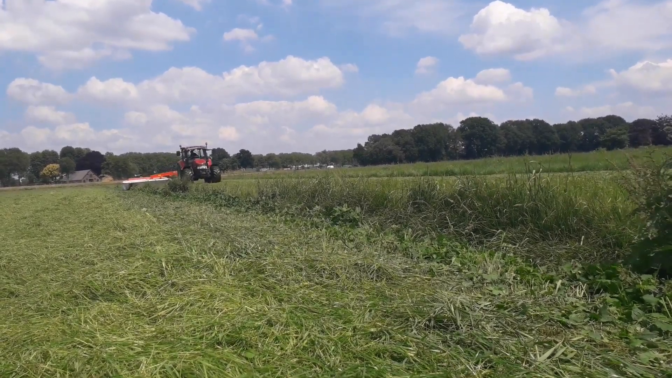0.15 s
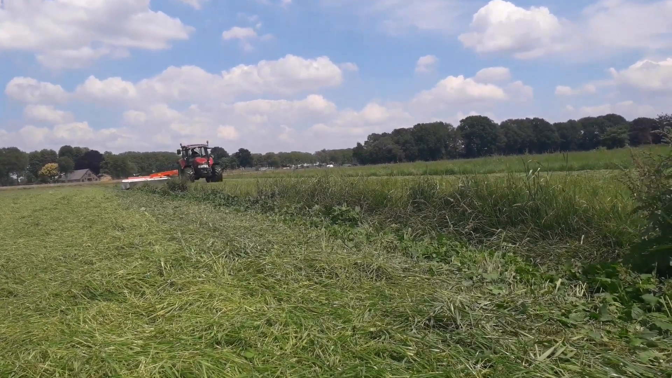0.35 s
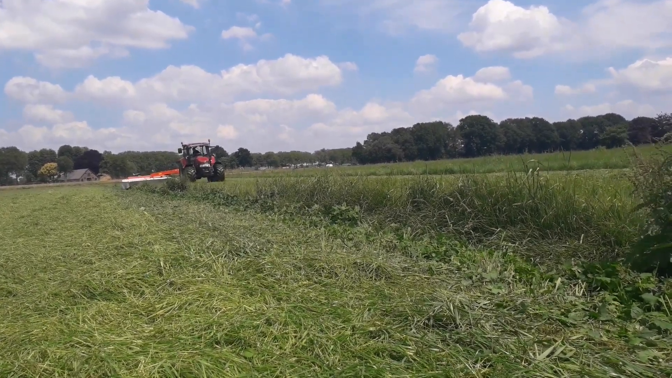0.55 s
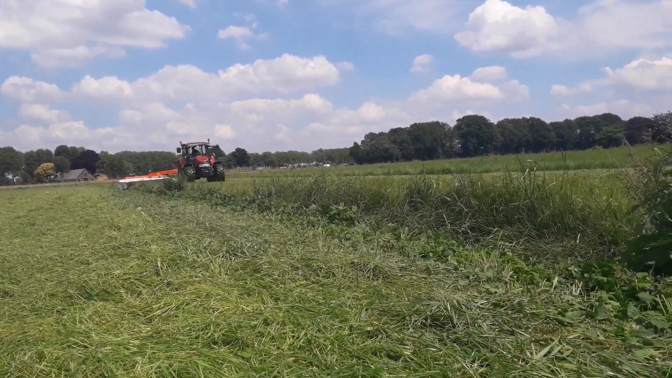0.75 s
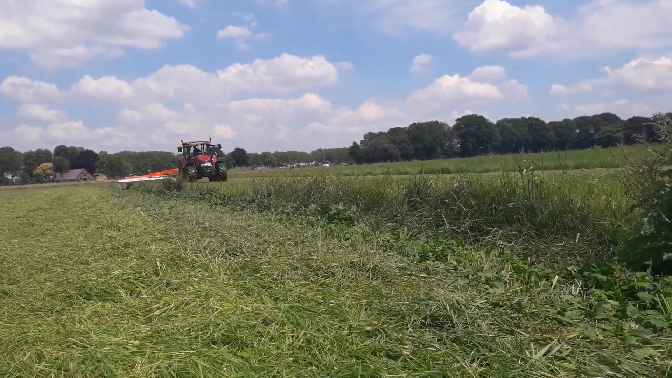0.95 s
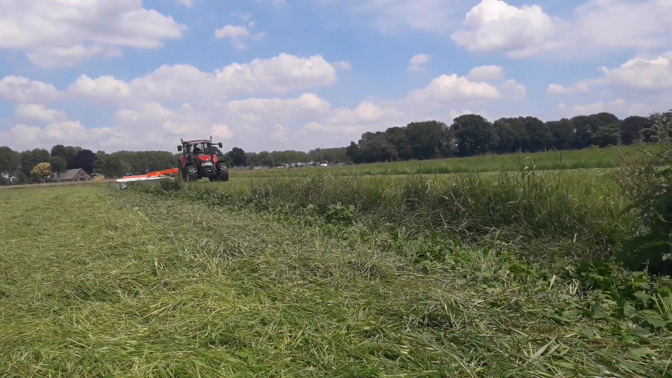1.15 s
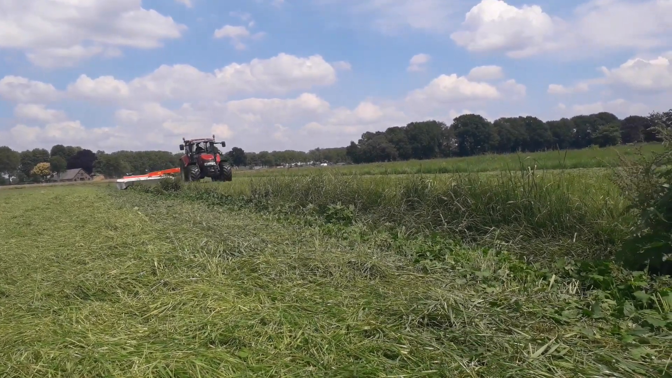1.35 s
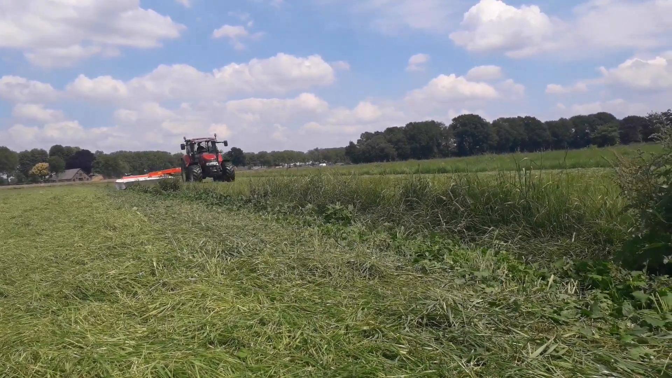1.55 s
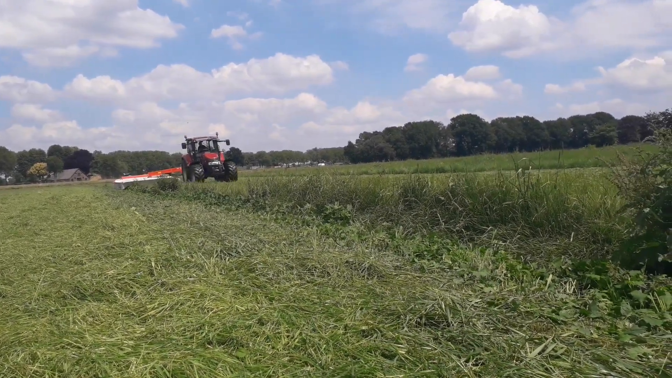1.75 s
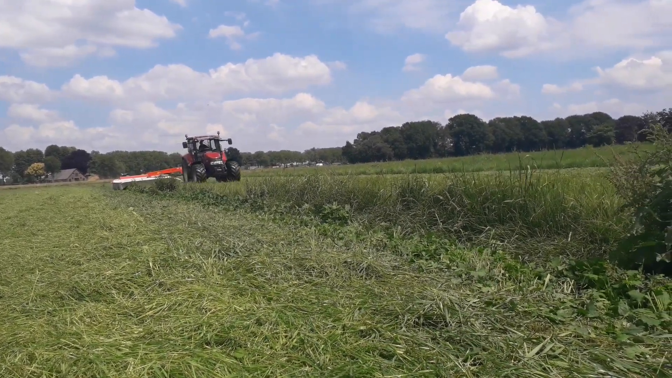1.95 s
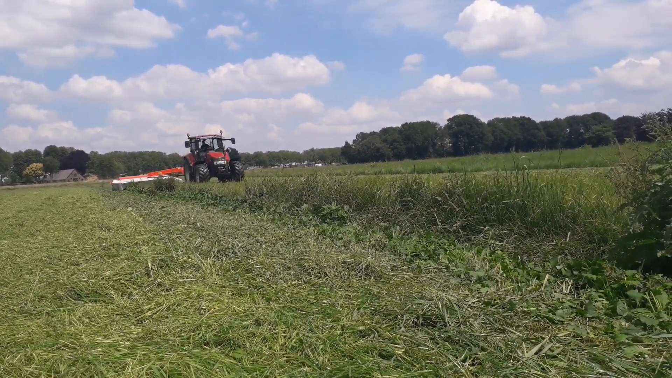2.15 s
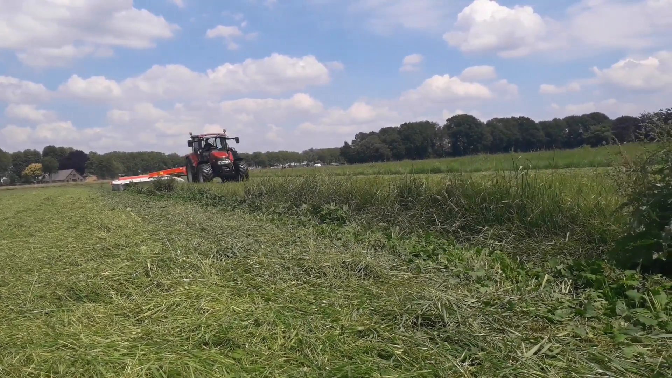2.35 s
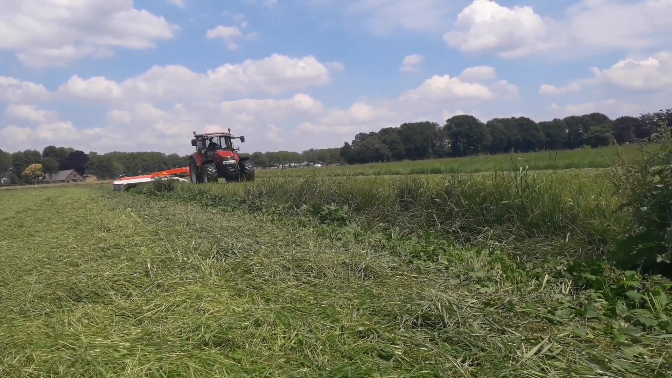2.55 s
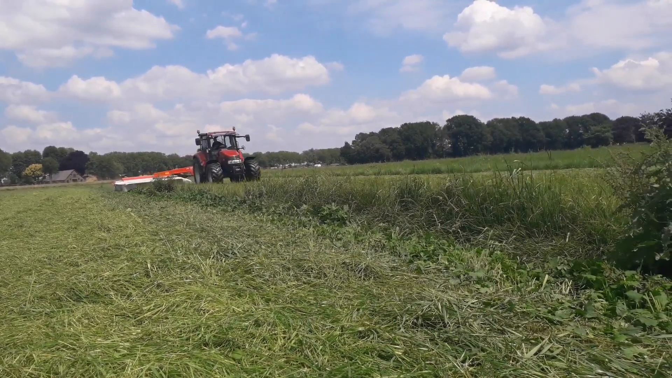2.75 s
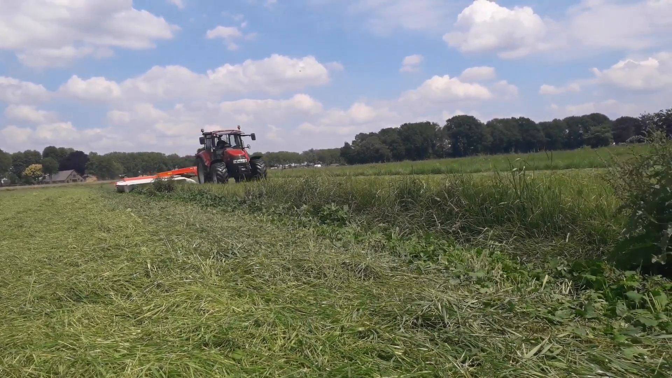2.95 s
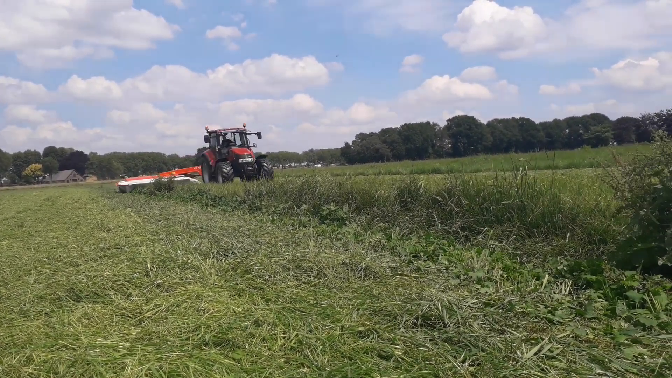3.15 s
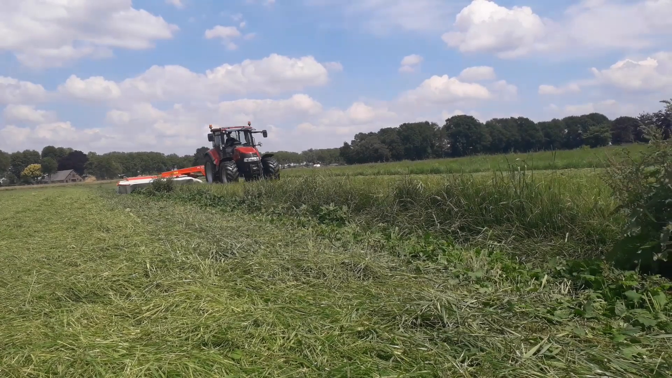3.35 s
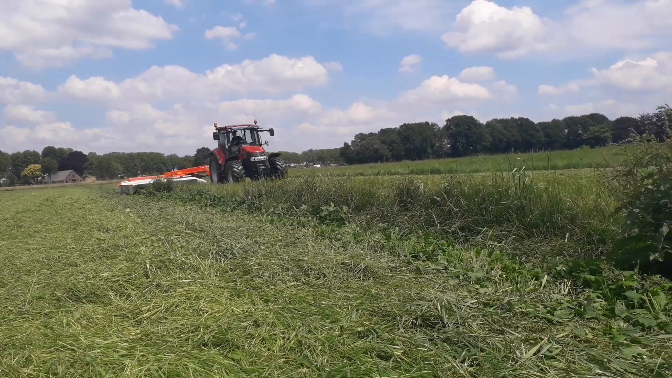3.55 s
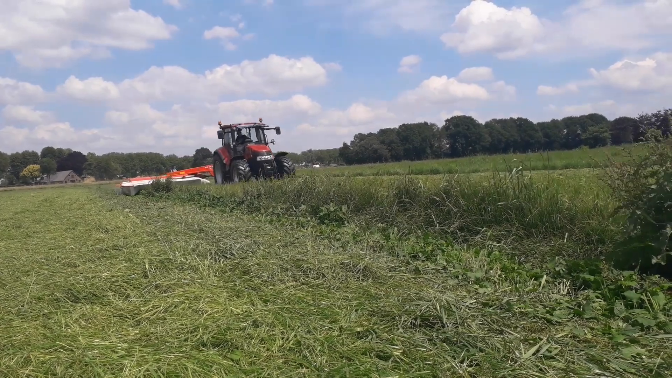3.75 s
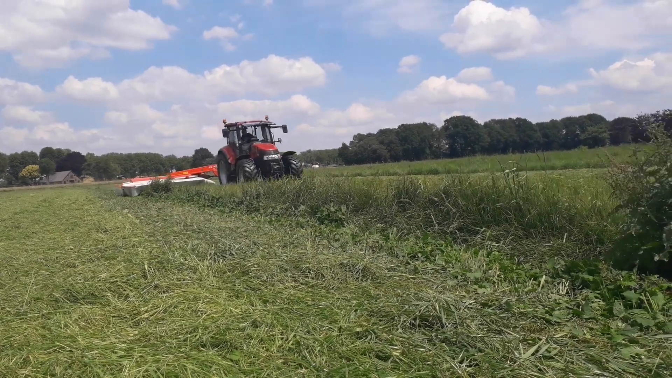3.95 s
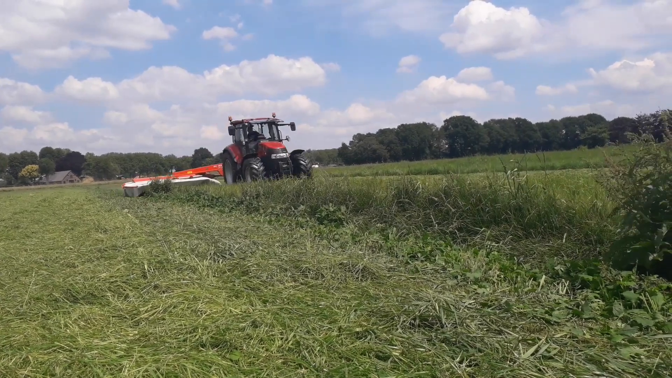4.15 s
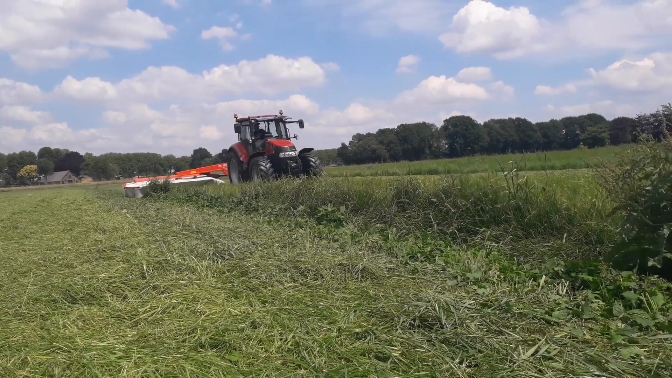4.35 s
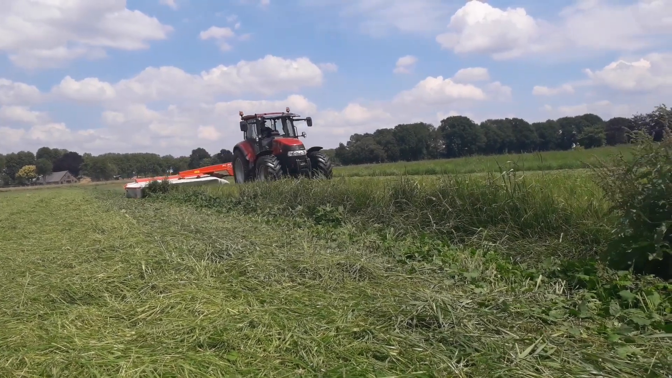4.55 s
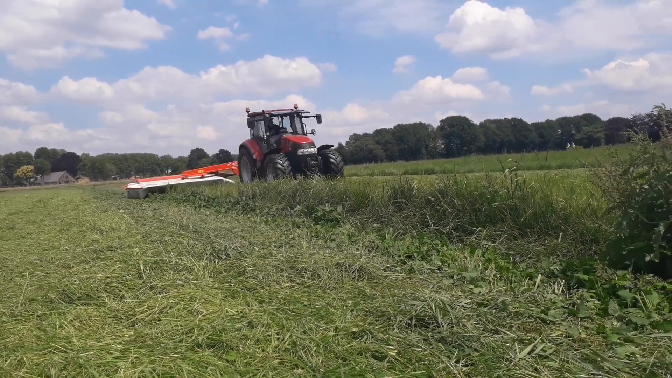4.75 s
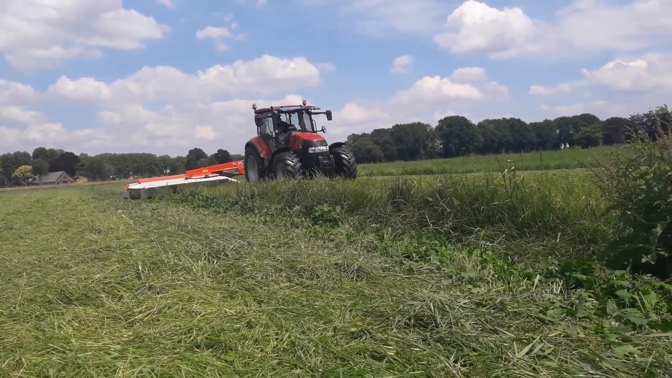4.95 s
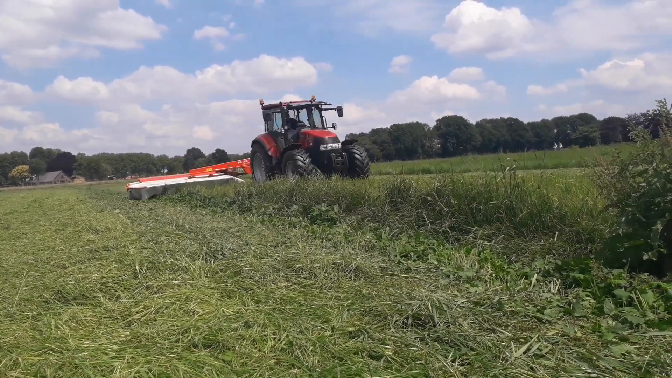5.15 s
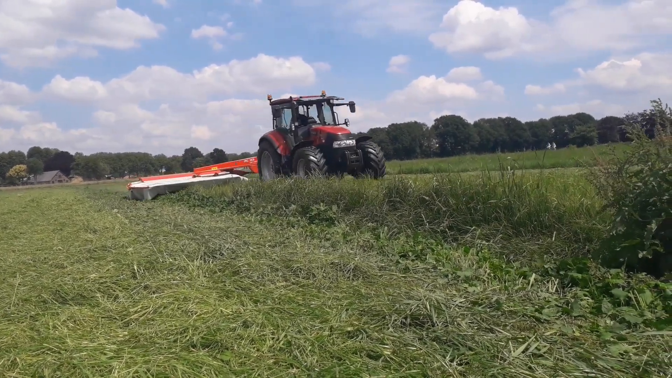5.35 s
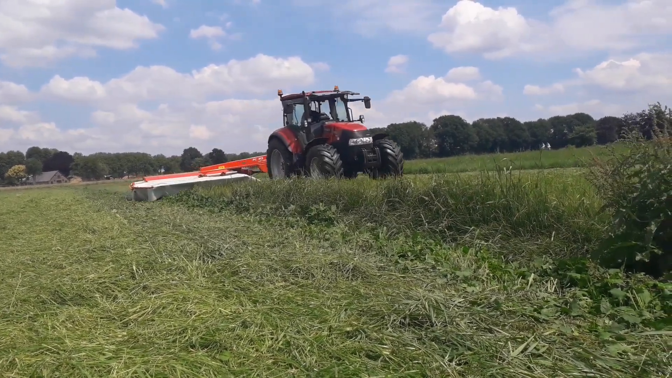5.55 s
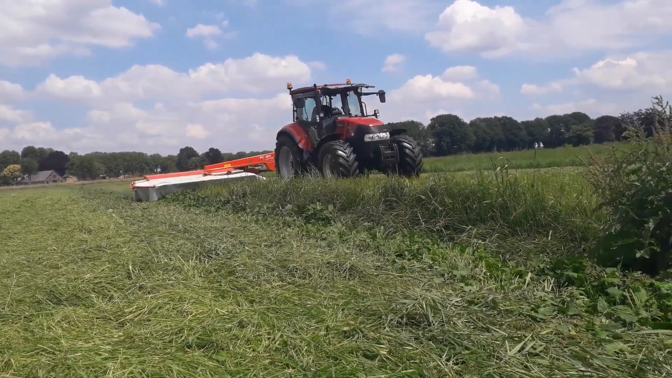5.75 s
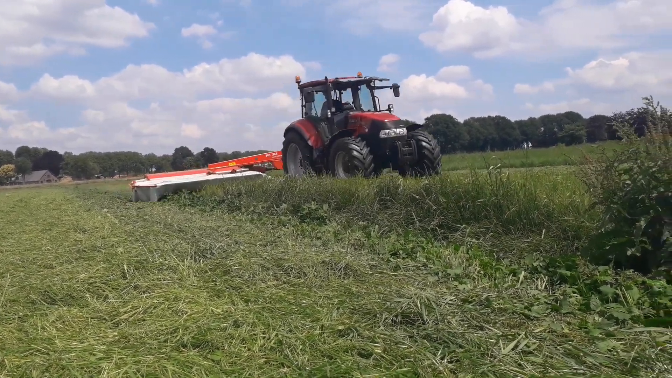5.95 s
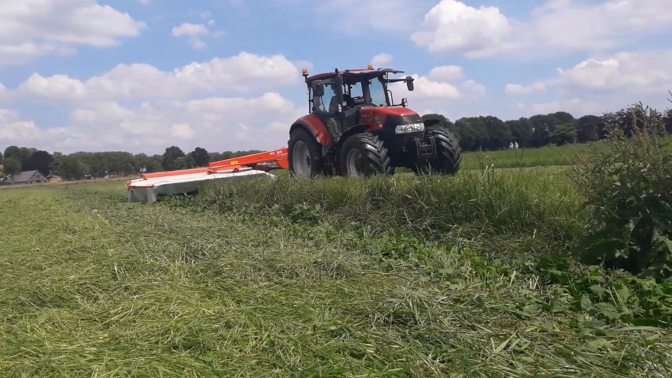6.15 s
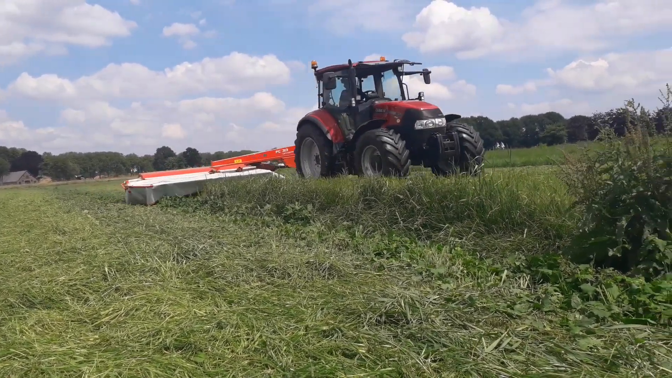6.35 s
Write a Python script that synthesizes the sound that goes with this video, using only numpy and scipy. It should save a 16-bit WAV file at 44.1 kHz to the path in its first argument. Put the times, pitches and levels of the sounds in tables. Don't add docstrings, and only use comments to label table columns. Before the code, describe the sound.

A tractor with a disc mower approaches across a meadow, its droning hum swelling over crackling, hissing cut grass while wind buffets the microphone.

```python
import sys
import numpy as np
from scipy import signal
from scipy.fft import rfft, irfft
from scipy.io import wavfile

SR = 44100
rng = np.random.default_rng(int(sys.argv[2]) if len(sys.argv) > 2 else 0)


def master(y):
    cut = np.clip(np.atleast_2d(y).T, -1, 1)
    pcm = np.round(cut * 32767)
    wavfile.write(sys.argv[1], SR, pcm.astype(np.int16))


def magnitude_from_level(level_db):
    exponent = np.asarray(level_db, float) / 20
    return 10 ** exponent


N = 282240

# time_s, second_knife_harmonic_hz, hum_level_db, roar_level_db
APPROACH = [(0.0, 209.5, -37.5, -43.5), (0.4, 206.9, -36, -43), (0.8, 205.3, -35.5, -42),
            (1.2, 204.0, -36.5, -41), (1.6, 204.0, -32.5, -40.5), (2.0, 204.8, -34.5, -39),
            (2.4, 205.3, -29, -38), (2.8, 206.0, -27.5, -37), (3.2, 206.3, -27.5, -37),
            (3.6, 206.2, -27, -35), (4.0, 206.0, -23.5, -33), (4.4, 205.9, -25.5, -32.5),
            (4.75, 205.2, -22.5, -31), (5.02, 204.4, -20.5, -30.5), (5.3, 205.9, -20.5, -30.5),
            (5.65, 205.2, -20, -28.5), (5.95, 206.3, -18.5, -27), (6.4, 206.2, -18.5, -26)]
# knife_rate_multiple, level_in_family_db
HUM_FAMILIES = [
    [(2, 0.1)],
    [(1, -3.5)],
    [(4, -0.5), (3, -4.5), (6.55, -10), (7, -10)],
    [(6, -5)],
    [(8, -7), (9, -8), (9.5, -9.5)],
    [(16, 0), (14, -3), (15, -2), (19.04, -4), (24, 0), (25, -7)],
    [(32, 0)],
]
# close_level_db, growth_db_per_db, far_level_db
HUM_GROWTH = [
    (-20.5, 1.0, -45),
    (-23.5, 1.34, -42),
    (-38, 2, -58),
    (-37, 2, -68),
    (-43, 1.4, -57),
    (-44, 1.5, -60.5),
    (-46, 3, -59.5),
]
# centre_s, half_length_s, change_db
HUM_SPELLS = [
    [],
    [(.8, .4, 2.5), (3.2, 0.34, 5)],
    [(3.4, 0.65, -2), (4.4, 0.25, 5)],
    [(4.74, 0.85, 3), (5.9, 0.42, -6)],
    [(3.2, .3, 8), (4.58, 0.69, 8), (5.3, .3, -12)],
    [(1.06, 0.4, 9), (1.9, 0.69, 7.5), (6.6, 0.55, -1), (4.6, 0.65, 3.5)],
    [(.75, .25, 14), (2.1, .3, 10), (5.1, .4, 8)],
]
# frequency_hz, density_db (per Hz)
ROAR_COLOUR = [(250, -56), (430, -10.5), (472, -13.5), (563, -13), (617, -10), (724, -13), (821, -7),
               (1090, -7.5), (1590, -4.5), (2330, -9.5), (3200, -8), (4160, -14), (7040, -120)]
# frequency_hz, gain_db
GROUND_DIP = [(20, -5.5), (1000, 0), (1080, -3.5), (1260, -1), (20000, 1.5)]
# time_s, hiss_level_db, air_clearness_db
CUT = [(0.0, -37, -4), (0.2, -41, 1), (0.5, -35.5, -2.5), (0.6, -36.5, -2), (0.78, -37, -1),
       (0.88, -37, -5), (1.1, -35.5, -0.5), (1.44, -37, -7.5), (1.9, -36.5, -4), (2.5, -36, -2.5),
       (2.96, -35, -1), (3.45, -34.5, 4), (4.0, -32, -4), (4.5, -31, 0.5), (5.15, -29, 1.5),
       (5.55, -27.5, 2), (6.0, -25.5, 2), (6.4, -26, 4.5)]
# frequency_hz, density_db
CUT_COLOUR = [(1900, -5), (2650, -5.5), (3300, -0.5), (3900, -1), (4700, -1), (5600, -3.5), (6680, -7),
              (8070, -7.5), (9100, -6), (9750, -4), (10500, -7.5), (11300, -10), (13000, -12.5),
              (15800, -20.5)]
# centre_s, swell_db, half_length_s, brightness_db
TUFTS = [(0.0, 5.5, 0.035, 0), (0.052, -2.5, 0.048, 9), (0.302, 5.5, 0.18, -0.5), (0.705, 4, 0.083, -1.5),
         (0.81, 2.5, .04, -1), (1.02, 3, 0.12, 1.5), (1.168, 3, 0.055, 1.5), (1.57, 0.5, .04, 3),
         (1.646, 0.5, 0.03, 5), (2.17, 1.5, 0.088, 2.5), (2.35, 1.5, 0.057, -0.5), (2.649, 7, 0.073, -1),
         (2.8, 1.5, 0.16, 5), (3.06, -1.5, 0.037, 3), (3.205, 4, 0.062, 1), (3.582, 2, 0.16, 0.5),
         (3.8, -1.5, 0.046, 4), (3.89, -1.5, 0.11, 2.5), (3.97, 1.5, .06, -2.5), (4.193, 2, 0.055, 1.5),
         (4.62, 1.5, 0.059, -0.5), (4.837, 5.5, 0.21, -2.5), (4.828, 3.5, 0.031, -4),
         (5.045, 2, 0.035, -1.5), (5.388, 2, 0.061, 5), (6.208, 0, 0.13, 1.5)]
# time_s, rumble_level_db, extra_depth_db (larger eddies are deeper)
BREEZE = [(0.0, -39, -5), (0.6, -37, -8), (0.9, -41, 0), (1.35, -37, -4), (1.75, -35.5, -8),
          (2.21, -37.5, 4), (2.41, -26, -4), (2.6, -34, 1), (2.8, -37, 2), (2.97, -28, -2),
          (3.3, -31.5, -2), (3.83, -28, 2), (4.1, -32.5, -5), (4.33, -28.5, 14), (4.47, -24.5, -3),
          (5.05, -38, 10), (5.3, -28.5, -2), (6.3, -29.5, -4)]
# frequency_hz, density_db (per Hz)
BREEZE_COLOUR = [(13, -56), (22, -28.5), (81, -2.5), (156, -2), (190, -0.5), (230, -11), (254, -9),
                 (360, -19.5), (620, -43), (810, -59), (1360, -120)]
# centre_s, peak_db, pitch_hz
SNAPS = [(0.0021, -20, 6200), (0.0358, -28, 10000), (0.4082, -29, 12500), (0.4869, -24, 4700),
         (0.5537, -22, 6200), (0.565, -32, 12500), (0.6278, -27, 6200), (0.6956, -29, 12500),
         (0.815, -30, 12500), (0.8427, -22, 4700), (0.9518, -31, 12500), (0.961, -30, 12500),
         (0.9705, -28, 12500), (0.9806, -28, 12500), (0.9999, -27, 12500), (1.0383, -26, 12500),
         (1.1754, -28, 12500), (1.1838, -26, 8000), (1.205, -29, 12500), (1.2229, -22, 8000),
         (1.2551, -27, 8000), (1.2633, -32, 12500), (1.3108, -32, 12500), (1.3407, -28, 10000),
         (1.4347, -24, 6200), (1.4999, -30, 10000), (1.5194, -29, 10000), (1.5889, -27, 6200),
         (1.6257, -29, 10000), (1.6329, -29, 10000), (2.057, -29, 10000), (2.1601, -26, 10000),
         (2.1649, -27, 12500), (2.5182, -29, 12500), (2.6488, -22, 6200), (2.6581, -20, 4700),
         (2.7971, -23, 8000), (2.8838, -27, 12500), (3.149, -26, 12500), (3.2109, -22, 12500),
         (3.2791, -25, 12500), (3.4874, -22, 10000), (3.5773, -22, 8000), (3.6804, -22, 10000),
         (3.7737, -24, 8000), (3.7934, -24, 8000), (3.9728, -24, 10000), (4.6112, -23, 12500),
         (4.809, -18, 8000), (4.8336, -11, 4700), (5.1527, -15, 8000), (5.2846, -18, 8000),
         (5.3677, -15, 10000), (5.3819, -17, 8000), (6.0987, -15, 8000), (6.3444, -17, 8000)]
# centre_s, peak_db, pitch_hz
CRACKS = [(0.0428, -17, 10800), (0.2688, -19, 6276), (0.5786, -15, 7200), (0.7218, -16, 12200),
          (0.8006, -17, 8932), (0.9398, -23, 8241), (1.0186, -15, 10800), (1.0575, -21, 7500),
          (1.145, -23, 7384), (1.164, -18, 7500), (1.1936, -19, 7280), (1.2321, -24, 10000),
          (1.572, -18, 7881), (1.6546, -22, 9800), (1.8627, -26, 10218), (2.6683, -16, 7500),
          (0.1163, -21, 8500), (1.7276, -21, 7500), (2.7846, -21, 10769), (2.804, -22, 11337),
          (2.8429, -22, 8056), (3.1896, -19, 6299), (3.5613, -20, 8091), (3.7334, -17, 8286),
          (4.5371, -17, 10676), (5.3617, -17, 12521)]
# time_s, snap_db, thump_db, thump_hz
POPS = [(1.531, -37, -11.5, 135), (1.576, -35, -15, 129), (2.382, -33, -8, 111), (2.45, -16.5, -18, 150),
        (2.778, -24.5, -13, 160), (2.802, -27, -10, 114), (2.873, -13.5, -6.5, 120),
        (2.918, -16.5, -3, 102), (2.947, -32, -26, 85), (2.994, -22.5, -7.5, 102), (3.53, -33.5, -14, 143),
        (3.7, -23.5, -12, 96), (3.718, -35, -8, 112), (3.814, -20, -5, 106), (3.859, -22.5, -3, 133),
        (3.873, -13, -20, 111), (3.888, -26, -3, 157), (3.91, -15, -1, 107), (3.922, -22.5, -8, 133),
        (3.964, -23, -11, 96), (4.319, -34, -6, 149), (4.336, -24, -5.5, 155), (4.488, -26, -6, 122),
        (4.645, -29, -6, 137), (4.949, -24, -9, 129), (4.995, -23, -30, 100), (5.009, -25, -16, 168),
        (5.084, -19.5, -24, 158), (5.792, -39, -6, 153), (5.882, -21, -16, 134)]
# time_s, thump_db, thump_hz
PUFFS = [(0.185, -29, 142), (1.232, -13, 125), (1.427, -19, 134), (1.47, -23, 141), (2.066, -14, 101),
         (2.115, -20, 121), (2.243, -11, 98), (2.492, -7, 112), (2.856, -30, 164), (2.886, -12, 108),
         (2.984, -14, 147), (3.161, -7.5, 103), (3.398, -13, 127), (3.6, -18, 150), (4.239, -20, 75),
         (3.836, -20, 127), (3.937, 0.5, 109), (4.195, -13, 101), (4.271, -16, 123), (4.375, -17, 120),
         (4.427, -11, 124), (4.546, -22, 154), (5.027, -5.5, 158), (5.074, -3.5, 170), (5.502, -7, 147),
         (5.771, -5, 111), (5.908, -9, 122), (6.005, -27, 108), (6.079, -26, 132), (2.542, -9, 125),
         (2.611, -19, 136), (3.062, -24, 134), (3.227, -22, 126), (3.415, -13, 154), (3.552, -23, 149),
         (3.981, -10, 138), (4.394, -14, 132), (4.719, -18, 137), (4.85, -21, 158), (4.927, -17, 129),
         (4.974, -13, 171), (5.133, -22, 156), (5.522, -15, 144), (5.727, -13, 157), (5.967, -18, 116),
         (5.983, -16, 158), (6.157, -12, 120), (6.287, -14, 178), (6.313, -23, 170),
         (.08, -23, 110),
    (.24, -19, 160),
    (.4, -24, 160),
    (.527, -23.5, 150),
    (.68, -19, 143),
    (.89, -24, 170),
    (1.0, -19, 160),
    (1.05, -24, 150),
    (1.32, -26, 130),
]
# time_s, snap_db
FLICKS = [(2.481, -35), (2.787, -34), (2.895, -31), (2.912, -25), (3.436, -34), (3.571, -31), (3.825, -29),
          (3.837, -27), (4.169, -42), (4.184, -41), (4.246, -43), (4.27, -31), (4.364, -33), (4.387, -32),
          (4.411, -37), (4.427, -33), (4.449, -32), (4.471, -34), (4.519, -32), (4.673, -28), (4.851, -33),
          (4.971, -25), (5.167, -29), (5.207, -36), (5.246, -31)]
# start_s, peak_db, pitch_hz
HEAVES = [(0.176, -39, 80.7), (0.926, -41, 56), (1.174, -35, 88.8), (1.498, -29, 77.5), (1.843, -43, 61.9),
          (2.059, -30, 88.8), (2.225, -20, 88.8), (2.359, -24, 67.3), (2.525, -25, 75.4), (2.85, -33, 37.7),
          (2.863, -27, 88.8), (2.873, -23, 88.8), (3.107, -22, 80.7), (3.279, -24, 86.1),
          (3.372, -25, 70.0), (3.499, -26, 72.7), (3.678, -29, 88.8), (3.875, -21, 37.7),
          (3.875, -17, 88.8), (4.172, -34, 88.8), (4.234, -23, 88.8), (4.313, -24, 86.1),
          (4.914, -38, 88.8), (4.929, -35, 88.8), (4.98, -24, 88.8), (5.324, -29, 86.1), (5.617, -28, 88.8),
          (5.86, -33, 37.7), (5.86, -29, 88.8), (6.13, -27, 88.8)]
# centre_s, low_hz, high_hz, difference_db
SLIPS = [(2.025, 4515, 6364, -48), (2.025, 12276, 13781, -58), (2.42, 8836, 11000, -51),
         (2.56, 10234, 11782, -52), (5.115, 8148, 9718, -43), (5.115, 13652, 15179, -53),
         (5.58, 4200, 5700, -35), (5.58, 13695, 15222, -49), (5.58, 15265, 15845, -55),
         (5.83, 13800, 15910, -48), (6.0, 5568, 7675, -33), (6.045, 4140, 5130, -35),
         (6.045, 5590, 6923, -40), (6.045, 7460, 9030, -38), (6.18, 14319, 15910, -47)]
# start_s, loudest_s, end_s, pitch_hz, glide_hz_per_s, peak_db
WHISTLE = [
    (2.3, 2.6, 2.8, 15070, 90, -63),
    (2.95, 3.55, 3.7, 15105, 15, -60),
    (3.75, 4.0, 4.2, 15110, 90, -54),
    (4.2, 4.55, 4.75, 15095, -40, -60),
    (5.45, 5.95, 6.05, 15570, 150, -54),
    (6.05, 6.2, 6.5, 15540, -200, -54),
    (6.2, 6.33, 6.45, 15010, 300, -54),
]


def rms_one(x):
    return x / np.sqrt(np.mean(x ** 2) + 1e-20)


def in_time(rows):
    s, *columns = np.transpose(rows)
    return [np.interp(np.arange(N) / SR, s, column) for column in columns]


def triangle(centre_s, half_s):
    return np.clip(1 - np.abs(np.arange(N) / SR - centre_s) / half_s, 0, 1)


def drift(rate):
    pole = np.exp(-40 * np.pi * rate / SR)
    noise = rng.standard_normal(N // 20 + 2002)
    slow = signal.lfilter([1], [1, -2 * pole, pole * pole], noise)[2000:]
    return np.interp(np.arange(N) / 20, np.arange(len(slow)), rms_one(slow))


def coloured(x, spectrum):
    hz, db = np.transpose(spectrum)
    bins = np.maximum(np.fft.rfftfreq(len(x), 1 / SR), 1)
    gain = magnitude_from_level(np.interp(np.log(bins), np.log(hz), db, left=-120, right=-120))
    return irfft(rfft(x) * gain, len(x))


def bands(x, edges_hz):
    bins = np.log(np.maximum(np.fft.rfftfreq(len(x), 1 / SR), 1))
    whole = rfft(x)
    tents = np.eye(len(edges_hz))
    return [irfft(whole * np.sqrt(np.interp(bins, np.log(edges_hz), tent)), len(x)) for tent in tents]


def patchy(source, spectrum, tilts, patchy_db, rate, count):
    centres = np.geomspace(spectrum[0][0], spectrum[-1][0], count)
    tilt_hz = np.log([hz for hz, db in tilts])
    tilt_db = np.array([db - np.mean(db) for hz, db in tilts])
    draws = [bands(coloured(source(), spectrum), centres) for k in range(2)]
    out, shared = 0, drift(rate)
    for k, hz in enumerate(centres):
        share = [np.interp(np.log(hz), tilt_hz, tent) for tent in np.eye(len(tilts))]
        flicker_db = patchy_db * (0.35 * shared + drift(rate))
        out = out + draws[k % 2][k] * magnitude_from_level(share @ tilt_db + flicker_db)
    return rms_one(out)


def without_deep_bass(x):
    return signal.sosfilt(signal.butter(2, 40.0, "high", fs=SR, output="sos"), x)


def hum_levels(hum_db):
    levels_db = []
    for (close_db, growth, far_db), spells in zip(HUM_GROWTH, HUM_SPELLS):
        level_db = np.maximum(close_db + growth * (hum_db + 19.5), far_db)
        levels_db.append(level_db + sum(db * triangle(s, half_s) for s, half_s, db in spells))
    return levels_db


def discs(knife, levels_db):
    out = 0
    for family, level_db in zip(HUM_FAMILIES, levels_db):
        for multiple, db in family:
            wobble = min(.03 * multiple, .45) * drift(5.0) + rng.uniform(0, 2 * np.pi)
            waver_db = min(.3 * multiple, 2.2) * drift(5.0)
            out = out + magnitude_from_level(level_db + db + waver_db) * np.sin(multiple * knife + wobble)
    return np.sqrt(2) * out


def roar(level_db):
    low_db = 0.13 * level_db - 0.35 * drift(1.7)
    tilts = [(800, low_db), (1500, 0 * low_db)]

    def engine():
        return coloured(rng.standard_normal(N), GROUND_DIP)
    return magnitude_from_level(level_db + 0.6) * patchy(engine, ROAR_COLOUR, tilts, patchy_db=0.57, rate=26.0, count=7)


def grass():
    level_db, clear_db = in_time(CUT)
    swell_db = sum(db * triangle(s, half_s) for s, db, half_s, bright_db in TUFTS)
    tuft_db = sum(bright_db * triangle(s, half_s) for s, db, half_s, bright_db in TUFTS)
    low_db = -.4 * swell_db
    bright_db = 0.3 * clear_db + 0.79 * tuft_db
    return level_db + swell_db, low_db, bright_db, clear_db + tuft_db


def cutting(knife):
    level_db, low_db, bright_db, top_db = grass()
    sweep = 1 + .035 * np.sin(knife / 2) + .05 * np.sin(knife + 1.3) + .04 * np.sin(2 * knife + 2.2)
    crisp = np.linspace(1.3, .6, N)

    def stalks():
        struck = rng.random(N) < 5000 / SR
        strength = magnitude_from_level(3.2 * np.minimum(rng.exponential(1, N), 6))
        breaks = struck * strength * rng.choice([-1, 1], N)
        return crisp * rms_one(breaks) + rng.standard_normal(N)
    tilts = [(2400, low_db), (4500, 0 * top_db), (9000, bright_db), (13500, top_db)]
    hiss = patchy(stalks, CUT_COLOUR, tilts, patchy_db=.5, rate=63.0, count=9) / np.sqrt(1 + crisp ** 2)
    return magnitude_from_level(level_db + 4.0 + crisp * 0.5 * drift(72.0)) * sweep * hiss


def breeze(roar_db):
    level_db, deep_db = in_time(BREEZE)
    flutter_db = 1.0 * roar_db + 0.47 * level_db - 44
    lumps = magnitude_from_level((1.2 + 0.047 * (level_db + 26)) * drift(11.0))
    level = 0 * level_db
    tilts = [(45, deep_db), (85, 0.54 * deep_db), (120, level), (170, level), (300, flutter_db - level_db)]

    def eddies():
        return lumps * rng.standard_normal(N)
    return magnitude_from_level(level_db + 1.0) * patchy(eddies, BREEZE_COLOUR, tilts, patchy_db=0.2, rate=13.0, count=6)


def snaps():
    out, t = np.zeros(N + 100), (np.arange(100) - 40) / SR
    for s, db, hz in SNAPS:
        at = round(s * SR)
        ring = np.exp(-(t * hz / 1.1) ** 2) * np.sin(2 * np.pi * hz * t)
        out[at:at + len(t)] += magnitude_from_level(db + 0.5) * ring
    return out[:N]


def cracks():
    out, t = np.zeros(N + 100), (np.arange(100) - 30) / SR
    for s, db, hz in CRACKS:
        at = round(s * SR)
        tick = np.exp(-(t / .0001) ** 2) * np.sin(2 * np.pi * hz * t + .8)
        out[at:at + len(t)] += magnitude_from_level(db - .5) * tick
    return out[:N]


def pops():
    out, t = np.zeros(N + 3000), np.arange(3000) / SR
    puffs = [(s, db - 29, db, hz) for s, db, hz in PUFFS]
    flicks = [(s, db, db + 6, 170) for s, db in FLICKS]
    eddies = POPS + puffs + flicks
    chances = rng.uniform(-0.9, 1, (len(eddies), 2))
    for (s, snap_db, thump_db, thump_hz), (lean, sharp) in zip(eddies, chances):
        edge = (t - .005) * 266 * (1 + 0.053 * sharp) * 4.4
        snap = np.cos(1.17 * edge + 0.91 + 0.6 * lean) / (1 + edge ** 2 / 2) ** 1.24
        swell = t / 0.0077 * np.exp(1 - t / 0.0048)
        thump = swell * np.sin(2 * np.pi * thump_hz * (t - .005) * (1.12 - 11.0 * t))
        push = np.sign(snap_db - thump_db + 15.5)
        at = round((s - .005) * SR)
        out[at:at + len(t)] += push * (magnitude_from_level(snap_db + 9.5) * snap - magnitude_from_level(thump_db - 4.5) * thump)
    return without_deep_bass(out[:N])


def heaves():
    out, t = np.zeros(N + 4000), np.arange(4000) / SR
    for s, db, hz in HEAVES:
        at, turns = round(s * SR), t * hz
        swell = np.sin(np.pi * np.minimum(turns / 3, 1)) ** 2
        out[at:at + len(t)] -= magnitude_from_level(db - 4.5) * swell * np.sin(2 * np.pi * turns)
    return without_deep_bass(out[:N])


def slips():
    out, length = np.zeros(N), 2048
    for s, low_hz, high_hz, db in SLIPS:
        noise = coloured(rng.standard_normal(length), [(low_hz, 0), (high_hz, 0)])
        at = round(s * SR) - length // 2
        out[at:at + length] += magnitude_from_level(db + 2.0) * rms_one(noise) * np.hanning(length) ** 1.2
    return out


def whistle():
    out, t = 0, np.arange(N) / SR
    for start, loudest, end, hz, glide, peak_db in WHISTLE:
        db = peak_db - 6 * np.interp(t, [start, loudest, end], [1, 0, 1])
        fade = np.clip(np.minimum(t - start, end - t) / .1 + .5, 0, 1)
        gain = fade * magnitude_from_level(db + 2 + 3 * drift(8.0))
        pitch_hz = hz + glide * (t - loudest) + 9.0 * drift(40.0)
        turn = 2 * np.pi * np.cumsum(pitch_hz) / SR
        out = out + gain * (np.sin(turn) + magnitude_from_level(-5) * np.sin(turn + 2 * np.pi * 60 * t))
    return out


def scene():
    hum_hz, hum_db, roar_db = in_time(APPROACH)
    knife = np.pi * np.cumsum(hum_hz) / SR
    mower = discs(knife, hum_levels(hum_db)) + roar(roar_db) + whistle()
    stalks = cutting(knife) + snaps() + cracks()
    wind = breeze(roar_db) + pops() + heaves()
    mono = mower + stalks + wind
    return np.array([mono, mono])


def band_limit(x):
    return signal.sosfilt(signal.butter(12, 17050, fs=SR, output="sos"), x)


def record(dry):
    rounded = .75 * np.tanh(dry / .75)
    low_pass = signal.ellip(12, .3, 60, 15750, fs=SR, output="sos")
    mix = signal.sosfilt(low_pass, rounded) + slips() * [[1], [-1]]
    return band_limit(mix)


dry = scene()
out = record(dry)
master(out)
```